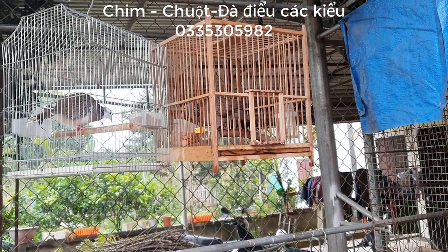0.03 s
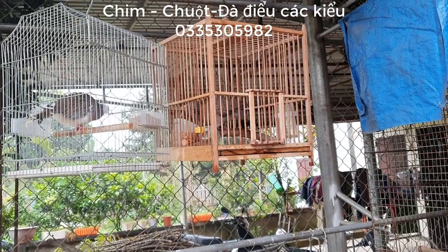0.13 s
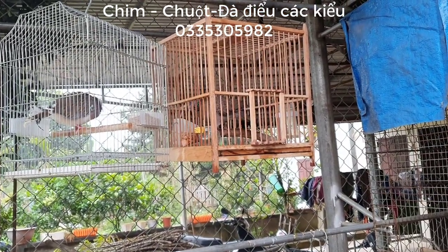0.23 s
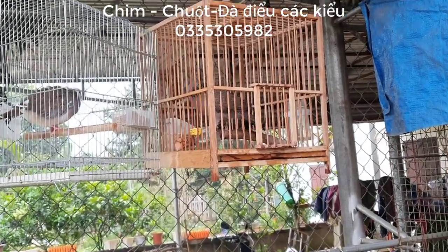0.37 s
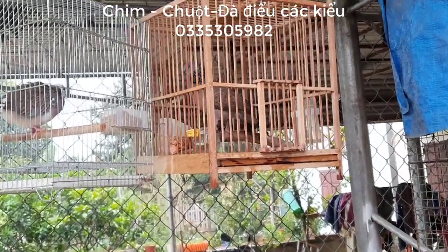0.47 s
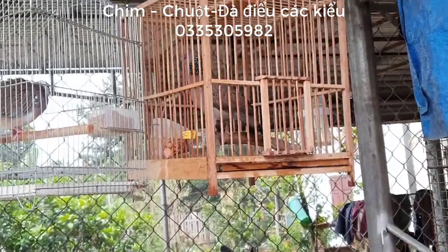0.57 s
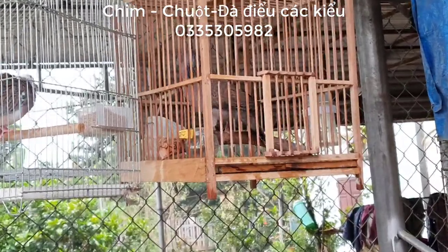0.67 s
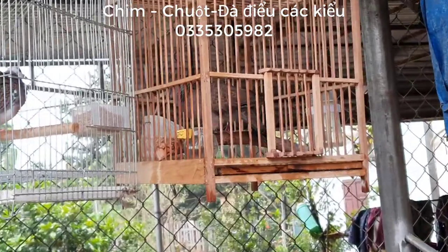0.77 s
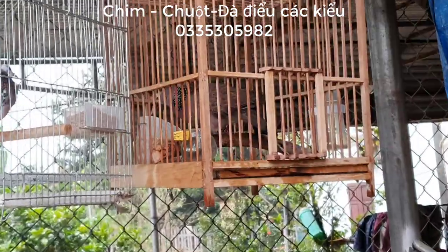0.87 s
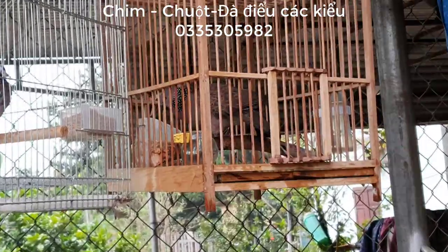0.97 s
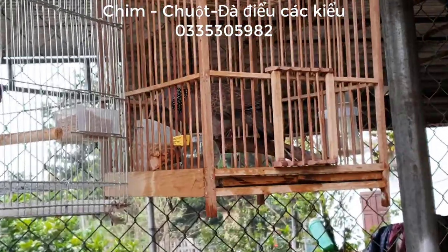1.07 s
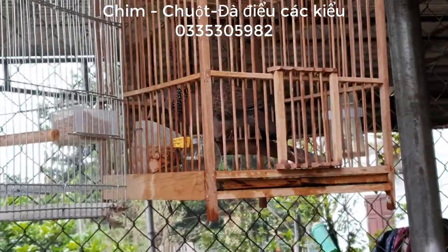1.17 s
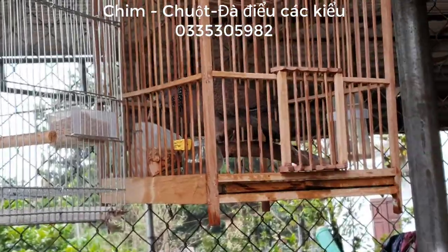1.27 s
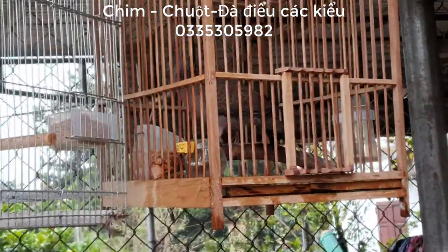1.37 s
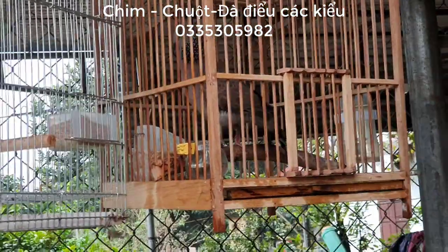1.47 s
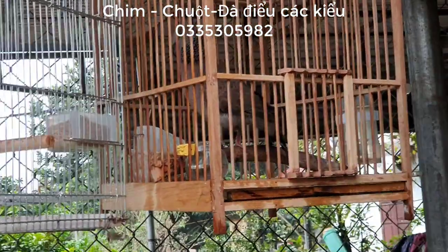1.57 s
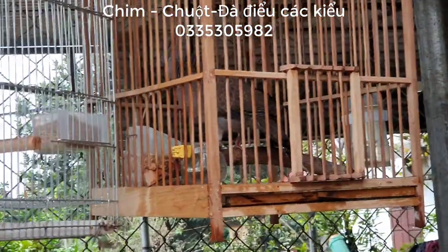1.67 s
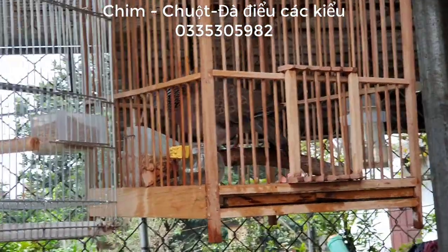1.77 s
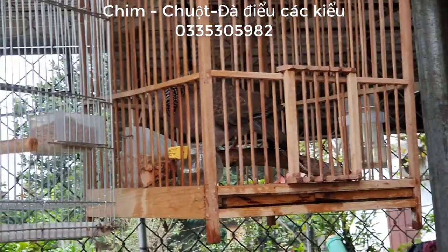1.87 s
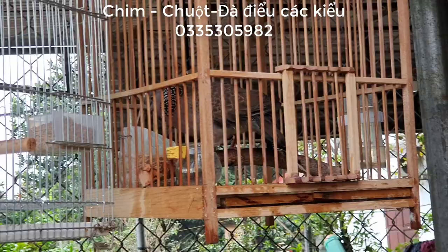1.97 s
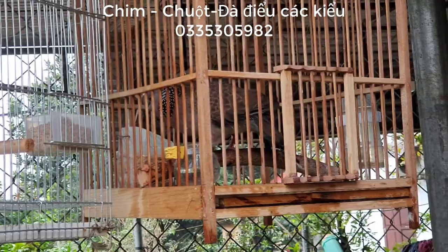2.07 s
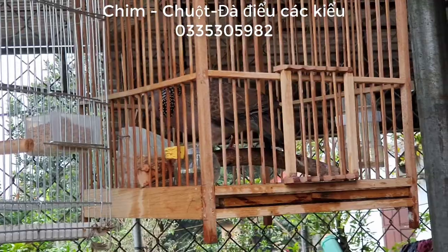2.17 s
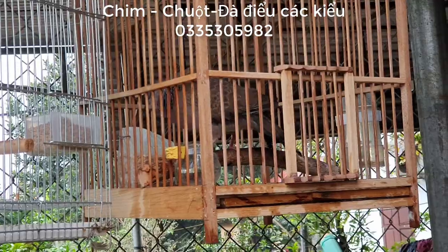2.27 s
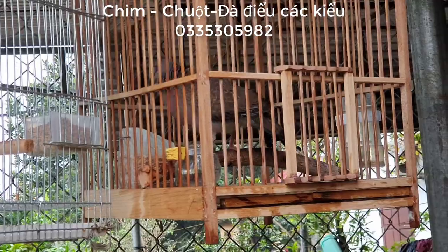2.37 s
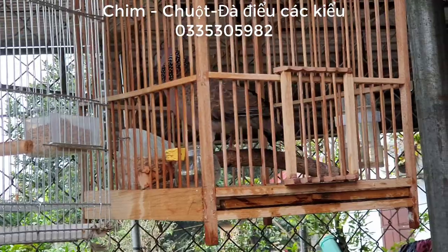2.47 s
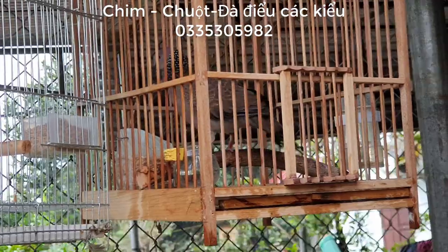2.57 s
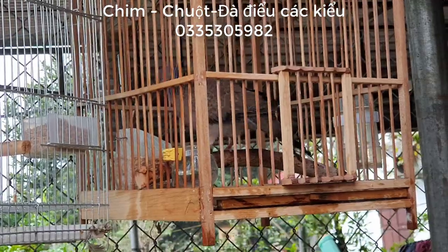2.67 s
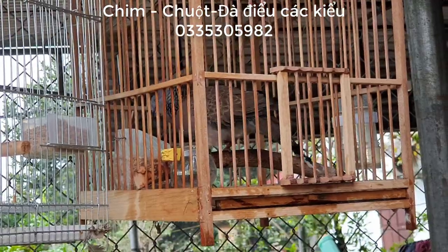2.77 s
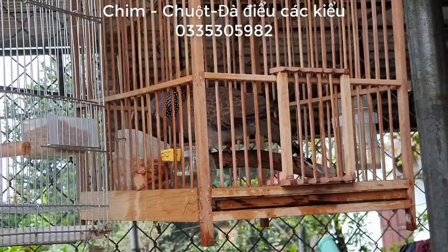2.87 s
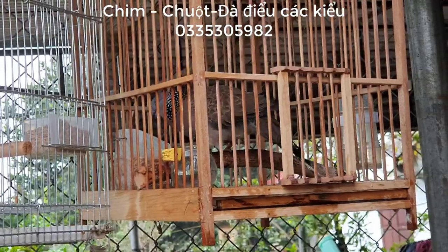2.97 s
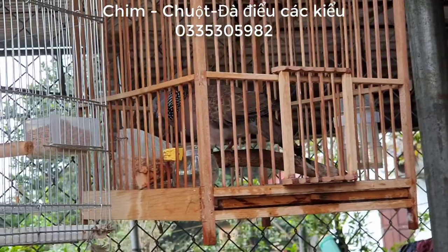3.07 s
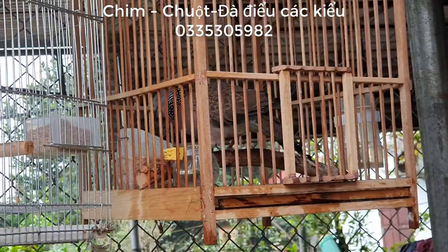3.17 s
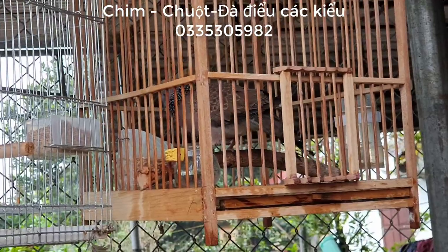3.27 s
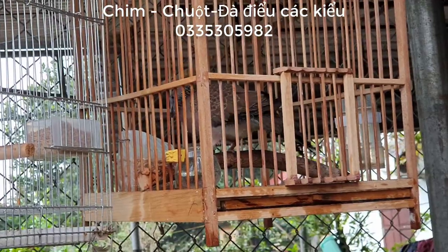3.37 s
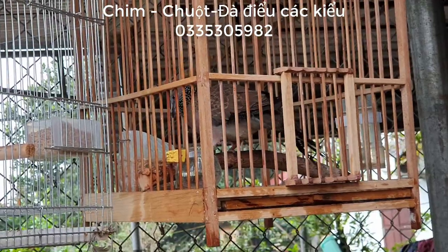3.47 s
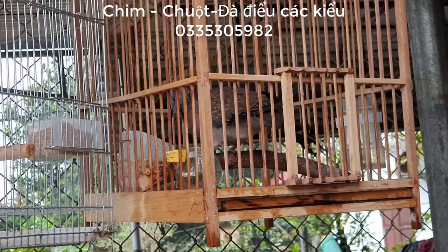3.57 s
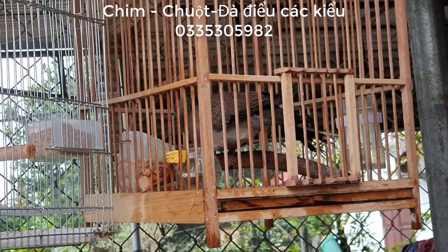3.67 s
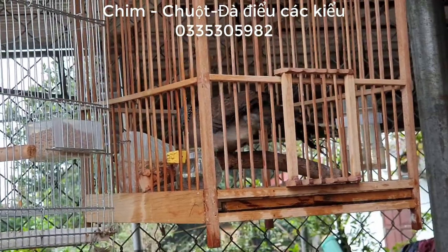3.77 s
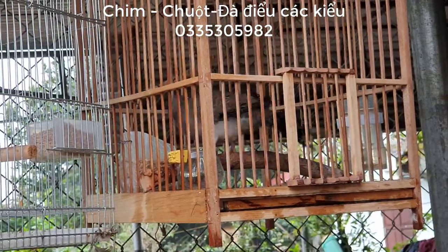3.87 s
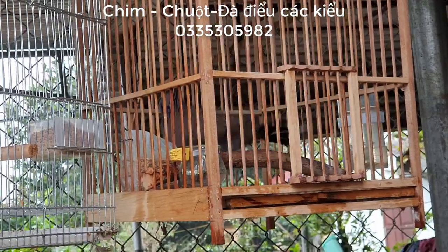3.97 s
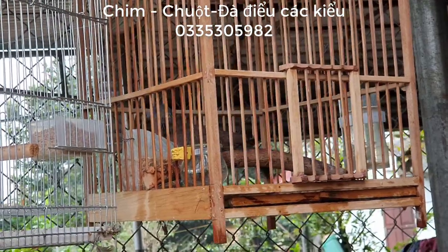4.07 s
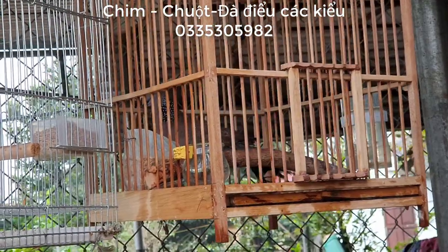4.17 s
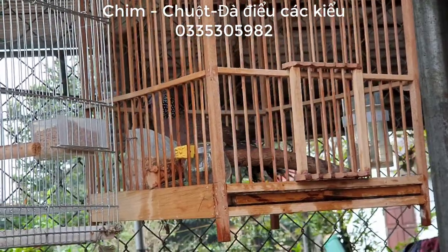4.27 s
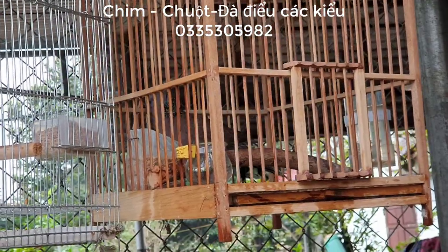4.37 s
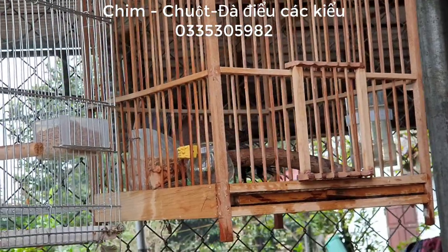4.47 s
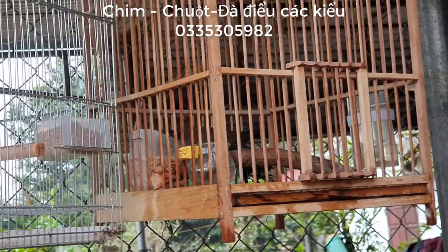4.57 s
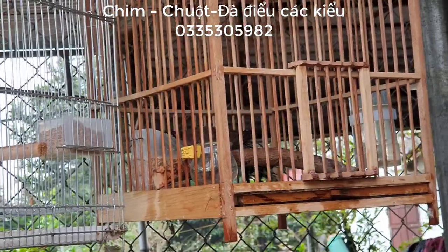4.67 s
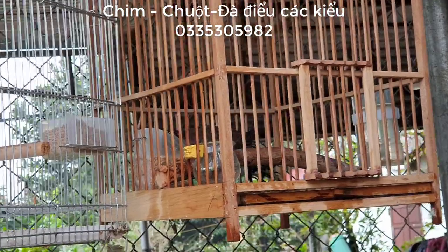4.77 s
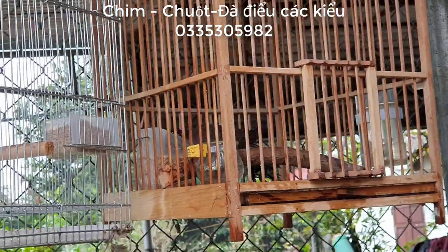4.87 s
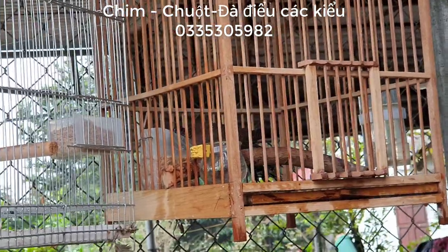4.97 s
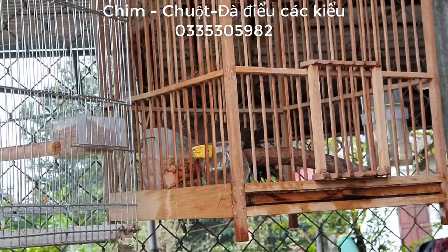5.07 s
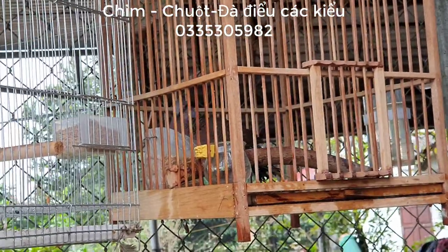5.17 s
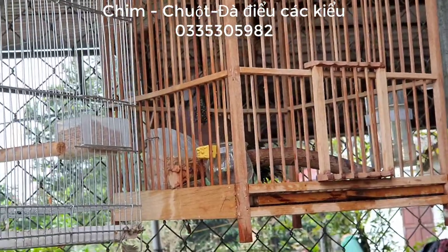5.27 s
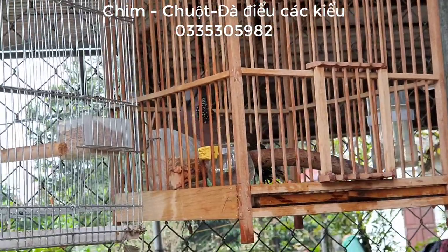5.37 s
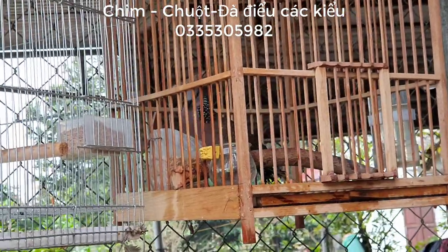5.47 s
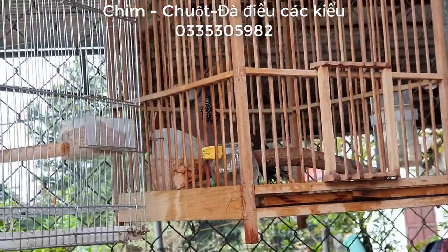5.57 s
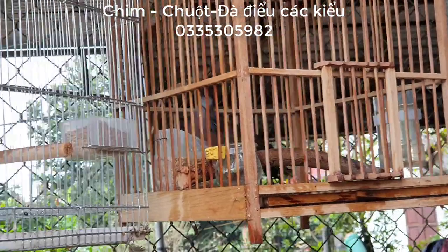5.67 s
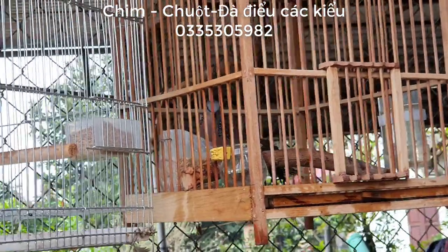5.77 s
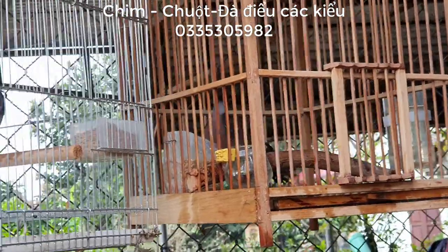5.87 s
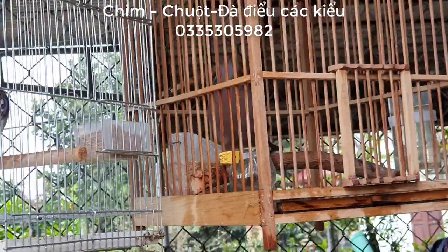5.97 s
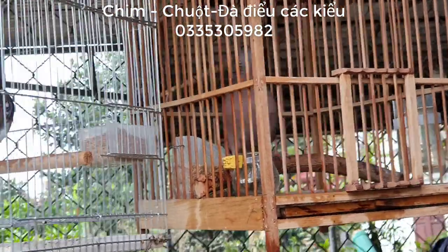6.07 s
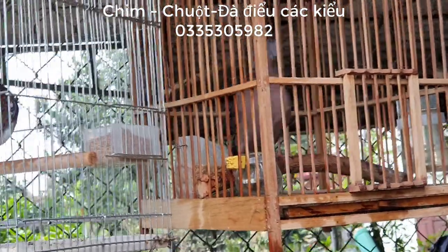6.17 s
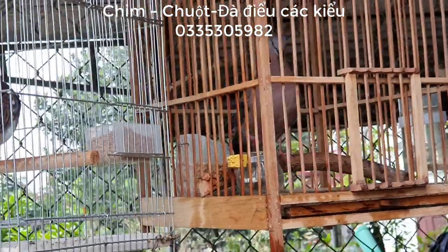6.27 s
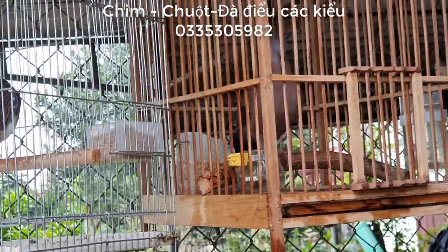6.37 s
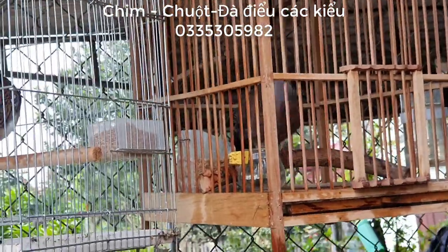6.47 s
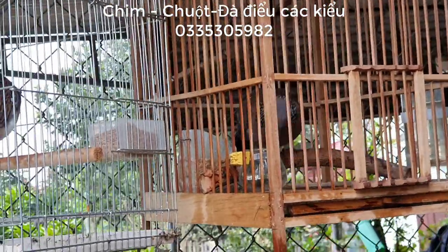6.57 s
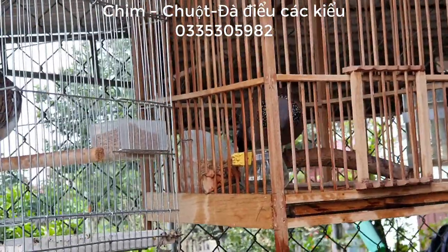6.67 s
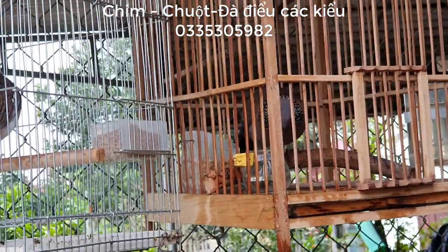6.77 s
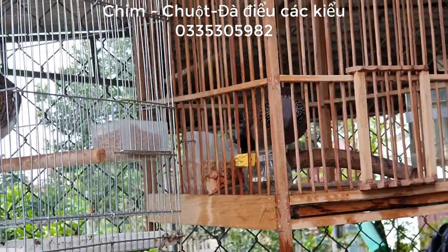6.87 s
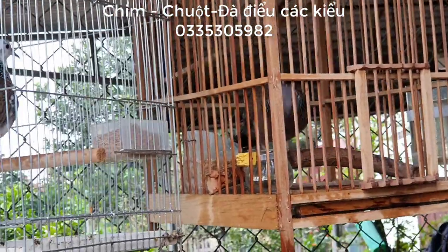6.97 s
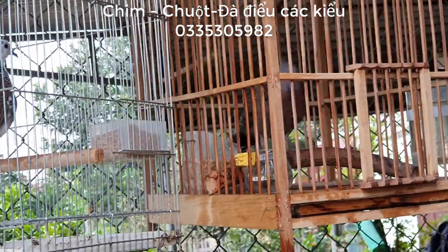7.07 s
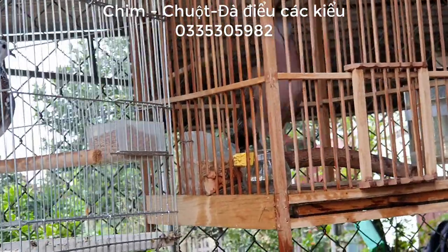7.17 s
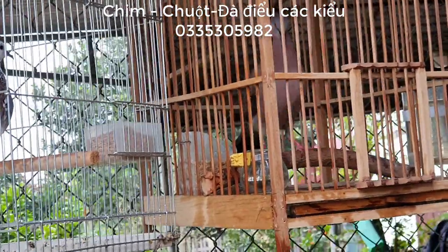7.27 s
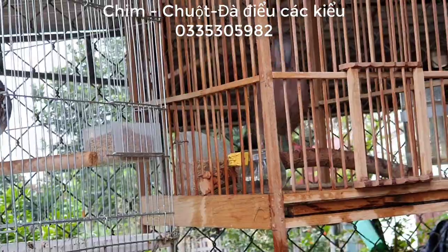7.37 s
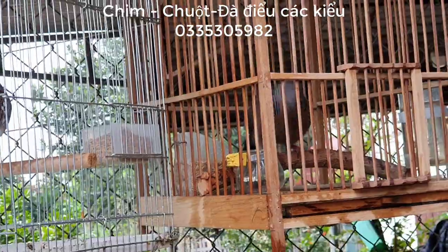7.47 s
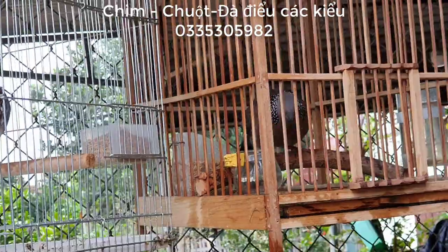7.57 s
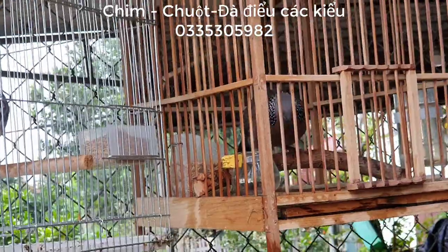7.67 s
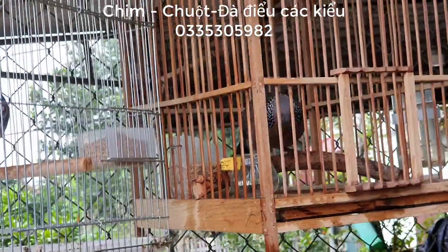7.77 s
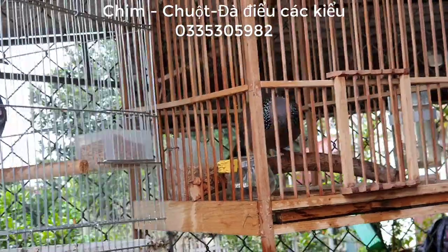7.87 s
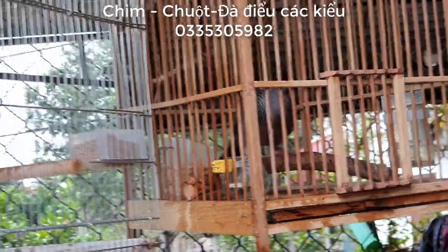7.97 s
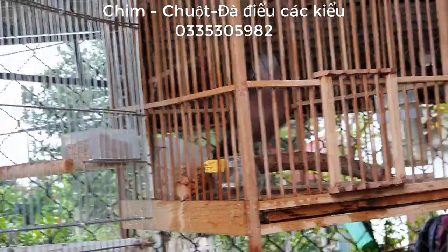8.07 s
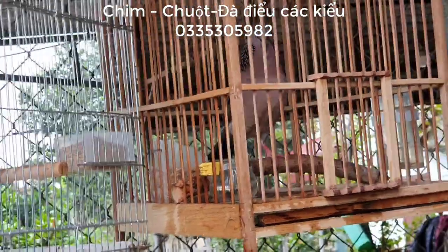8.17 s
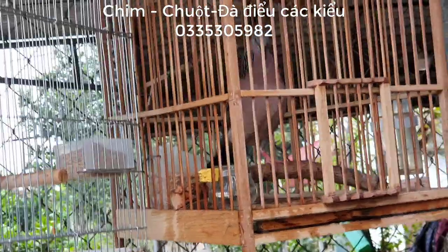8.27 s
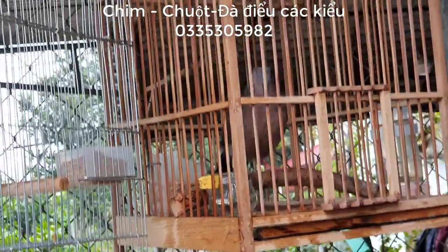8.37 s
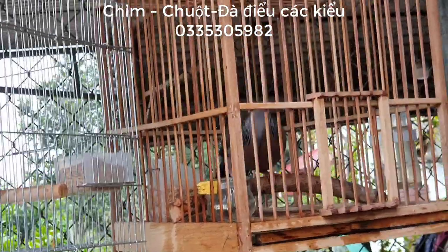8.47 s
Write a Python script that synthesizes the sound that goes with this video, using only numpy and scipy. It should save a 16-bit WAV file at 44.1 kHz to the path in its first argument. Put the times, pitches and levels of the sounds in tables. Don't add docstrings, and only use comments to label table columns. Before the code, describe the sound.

A nearby caged dove begins at once with a long, high, throbbing coo to 0.5 s, then a short soft note at 0.8. Long coos follow at 1.0, 2.0 and 3.0, with short notes before the latter two at 1.8 and 2.8. At 2.3 and 2.4 a finger hits the left microphone with two loud hard knocks, bouncing and scraping, with a parting rub near 2.55. A very faint distant coo comes at 3.7. A low held note at 4.56 leads to a hoarse long coo at 4.9; after a gap, short-long pairs come at 6.5 and 7.5, the last long one lower, and a short coo closes at 8.45. Brief roof reverberation trails the notes. Throughout, small wire ticks, mostly right, and wooden or plastic pecks sit over quiet rumble, shuffling and feather hiss. Thin insect shimmer comes and goes; faint bird whistles appear near 3.1 and from 7.4 to 8.2.

```python
import sys
import numpy as np
from scipy import signal
from scipy.fft import rfft, irfft, next_fast_len
from scipy.io import wavfile
from scipy.ndimage import uniform_filter1d, map_coordinates

SR = 44100
rng = np.random.default_rng(int(sys.argv[2]) if len(sys.argv) > 2 else 0)


def file_out(sig):
    cols = np.atleast_2d(sig).T
    lim = np.clip(cols, -1, 1)
    pcm = np.round(lim * 32767).astype(np.int16)
    wavfile.write(sys.argv[1], SR, pcm)


def undo_db(level):
    steps = np.asarray(level, float) / 20
    return 10 ** steps


N = 375732

# start_s, length_s, top_hz, level_db
SHORT_NOTES = [
    (0.78, 0.12, 720, -21),
    (1.763, 0.12, 702, -19),
    (2.78, 0.11, 703.4, -19.5),
    (6.506, 0.12, 698, -19),
    (7.461, 0.11, 717.5, -19),
    (8.452, 0.11, 698, -18),
]
# start_s, length_s, top_hz, level_db
HELD_NOTE = [
    (4.559, .195, 677, -19.5),
]
# start_s, length_s, top_hz, level_db, hoarseness_db
LONG_NOTES = [
    (.03, .47, 715, -13, 2.5),
    (.985, .4, 701, -12.5, -1),
    (1.981, 0.37, 701.7, -12.5, 1),
    (2.986, 0.34, 694.3, -12.5, 4),
    (4.86, 0.45, 711, -12.5, 3),
    (6.73, 0.38, 700, -13, 3.5),
    (7.665, 0.36, 684, -14, 4),
]
# start_s, length_s, top_hz, level_db before the loss on the way
FAR_NOTE = [
    (3.69, 0.11, 700, -21),
]
# share_of_length, upper_voice_below_top_hz, upper_db, lower_db
SHORT_COURSE = [(0, 118, -21, -12.5), (.14, 48.5, -2.5, -2), (.4, 1.5, -1.5, 0.5), (.68, 9.5, -0.5, 3.5),
                (.85, 65, -5.5, -3), (1, 161.5, -24.5, -9.5)]
# share_of_length, upper_voice_below_top_hz, upper_db, lower_db
HELD_COURSE = [(0, 95, -18, -12), (.1, 20, -4, 2.5), (.24, 0, -1.5, 3.5), (.5, 42, -3, 4.5),
               (.88, 42, -4.5, 4.5), (1, 100, -20, -4)]
# share_of_length, upper_voice_below_top_hz, upper_db, lower_db, throb_re_upper_db
LONG_COURSE = [(0, 122.5, -27, -15.5, -7.5), (.06, 85, -7, -15, -5), (.16, 18.5, -4.5, -13, -6),
               (.3, -1, -6, -6, -6), (.45, 38.5, -0.7, -18, -9), (.62, 78, -0.5, -21, -11),
               (.88, 147, -10, -31.5, -6.5), (.96, 187.5, -11, -37, -5.5), (1, 215.5, -26.5, -47.5, -11.5)]
# frequency_hz, gain_db
NECK_SKIN = [(300, -32.5), (450, -1.5), (540, -2.5), (620, 1), (720, -0.9), (790, -12), (1000, -9.5),
             (1400, -5.5)]

# time_s, peak_db
FINGER_KNOCKS = [
    (2.3005, -2.5),
    (2.319, -14),
    (2.3348, -31),
    (2.396, -3),
    (2.406, -5),
    (2.419, -15),
    (2.531, -19),
]
# time_s, thud_db, scrape_db
FINGER_PRESSES = [
    (2.306, -16.5, -35.5),
    (2.328, -26.5, -48),
    (2.384, -19.5, -19.5),
    (2.399, -13, -13.5),
    (2.433, -38, -20),
    (2.541, -35.5, -28.5),
]
# time_s, level_db
FINGER_SLIDE = [
    (2.299, -41),
    (2.306, -39),
    (2.367, -54),
    (2.385, -23),
    (2.401, -14),
    (2.431, -19),
    (2.538, -20.5),
    (2.55, -38),
    (2.6, -81),
]
# frequency_hz, density_db_per_hz
SKIN_SPECTRUM = [(1180, -22), (2000, -8), (3140, -2.5), (4380, -1), (7060, -6), (7640, -12.5), (13300, -15),
                 (16000, -17)]

# time_s, peak_db, left_minus_right_db, ring_hz
CLAW_TICKS = [(0.0696, -32, -17, 6230), (0.401, -27, -16.5, 9500), (0.549, -27, -8.5, 7130),
              (1.492, -34, -13, 8570), (1.6675, -30, -18, 12750), (1.821, -33, -17, 6100),
              (2.8364, -37, -14, 5310), (2.842, -29, -13, 7100), (3.2113, -27.5, -25, 7100),
              (3.8426, -35, -13, 8750), (4.043, -29, -6, 5000), (4.4526, -34, 8, 6300),
              (4.6038, -27, -17, 8640), (5.0568, -31, -14, 6500), (5.3042, -45, -25, 9700),
              (5.8236, -28, -17, 9200), (7.171, -31, -24, 7590), (7.3158, -40, -16, 9280),
              (7.445, -29, -13, 8600), (7.6922, -23, -24, 8800)]
# frequency_hz, width_hz, level_db
WIRE_MODES = [(3280, 500, -4.5), (6560, 490, -4.5), (8660, 640, 4.5), (11600, 800, 1.5), (13700, 2800, -5)]
# time_s, peak_db, ring_hz
SEED_TAPS = [(0.342, -34.5, 1750), (0.507, -37, 2850), (0.549, -32, 2130), (0.695, -38.5, 2580),
             (1.431, -37, 1720), (2.122, -31.5, 2510), (2.2207, -35.5, 1680), (2.6962, -39, 4560),
             (3.5013, -33, 4460), (3.5717, -30.5, 2525), (3.62, -37.5, 2080), (4.0216, -37, 2600),
             (4.043, -38.5, 2770), (4.2927, -34, 2020), (5.058, -32.5, 2550), (5.779, -35.5, 2360),
             (5.8221, -36, 1930), (6.06, -40, 2320), (6.598, -33.5, 2490), (8.143, -33.5, 2485),
             (8.4261, -34, 3520)]
# start_s, end_s, first_hz, last_hz, level_db
FAR_WHISTLES = [(3.094, 3.225, 3060, 3240, -58), (3.23, 3.298, 3330, 2880, -56),
                (6.607, 6.66, 2640, 2570, -64), (7.446, 7.563, 2900, 3000, -64),
                (7.64, 7.76, 3520, 3540, -56.5), (7.926, 8.044, 3360, 3700, -54),
                (7.835, 7.983, 4230, 4206, -51.5), (7.839, 7.928, 8800, 8650, -60),
                (7.84, 7.915, 11800, 11600, -60), (7.85, 7.94, 6300, 6300, -66),
                (8.141, 8.253, 2600, 2606, -61)]
# start_s, end_s, swell_db
INSECT_BOUTS = [
    (.8, 1.29, 11.5),
    (1.9, 2.598, 11),
    (2.98, 3.35, 9.5),
    (5.353, 6.3, 8.5),
    (6.75, 7.04, 11.5),
]
# frequency_hz, t60_s
ROOF_DECAY = [(300, 0.22), (700, 0.42), (4000, 0.26), (12000, 0.016)]

# time_s, half_length_s, scuffle_swell_db, feather_and_litter_hiss_swell_db
YARD_SHUFFLES = [(0.121, 0.082, 13, 6), (0.318, 0.14, 11, 5), (.5, 0.099, 8, 7), (1.112, 0.31, 9, 4),
                 (1.468, 0.065, 5.5, -0.5), (1.807, 0.16, 7, 1.5), (2.15, 0.19, 3.5, 1.5),
                 (2.397, 0.22, 8.5, 5.5), (2.726, 0.079, 2.5, 4.5), (2.865, 0.07, 3.5, 10),
                 (3.056, 0.27, 10, 4.5), (3.187, 0.046, 1.5, 4.5), (3.555, 0.083, -1.8, 12.5),
                 (3.71, 0.073, 3.5, -2.5), (3.922, 0.066, 2.5, 9), (4.007, 0.04, 3, 2), (4.357, 0.17, 8, 4),
                 (4.545, 0.3, 4, -0.5), (4.735, 0.049, 9, -0.5), (5.042, 0.24, 7, 5),
                 (5.942, 0.072, 6, 9.5), (5.46, 0.061, 11.5, 9), (5.817, 0.077, 10, 8),
                 (6.36, 0.12, 5.5, 4), (6.573, 0.13, 8, 8), (6.945, 0.21, 13, 5), (7.21, 0.069, 5, 8),
                 (7.542, 0.065, 8, 3), (7.866, 0.22, 8, 7.5), (8.41, 0.29, 8.5, 5)]
# frequency_hz, density_db_per_hz
RUMBLE_SPECTRUM = [(12, -53), (20, -11.5), (59, 2.5), (108, -7), (403, -8.5), (461, -15), (500, -24),
                   (650, -33.5), (1100, -120)]
# frequency_hz, density_db_per_hz
SCUFFLE_SPECTRUM = [(180, -21.5), (300, -9), (402, -2), (465, -2.5), (646, 2.5), (695, -5.5), (785, -1.5),
                    (5500, -24.5), (7150, -48), (12100, -120)]
# frequency_hz, density_db_per_hz
HISS_SPECTRUM = [(2350, -6), (4000, -4), (7880, -7.5), (8850, -6), (11100, -11.5), (12300, -8),
                 (14600, -14.5), (16000, -18.5)]
# frequency_hz, correlation
PORT_CORRELATION = [(60, 0.94), (240, 1), (950, 0.52), (3000, 0)]
# frequency_hz, left_minus_right_db
YARD_BALANCE = [(180, -1), (800, 3), (4500, -1), (9000, -7)]

VOICE_GAP_HZ = 95


def unit(x):
    return x / np.sqrt(np.mean(x ** 2) + 1e-20)


def along(points, hz):
    f, v = np.transpose(points)
    return np.interp(np.log(hz + 1), np.log(f + 1), v)


def curves(rows, t):
    s, *columns = np.transpose(rows)
    return [np.interp(t, s, column) for column in columns]


def wobble(rate_hz, size):
    knots = rng.standard_normal(int(size * rate_hz / SR) + 4)
    return map_coordinates(knots, [np.arange(size) * rate_hz / SR])


def filtered(x, response):
    m = next_fast_len(x.shape[-1] + 8192)
    return irfft(rfft(x, m) * response(np.fft.rfftfreq(m, 1 / SR)), m)[..., :x.shape[-1]]


def resonances(modes):
    def response(f):
        return sum((-1) ** k * undo_db(db) * 1j * f * width / (center * center - f * f + 1j * f * width)
                   for k, (center, width, db) in enumerate(modes))
    return response


def sides(pan_db):
    pair = undo_db(np.array([[pan_db / 2], [-pan_db / 2]]))
    return pair / pair.mean()


def dove():
    notes = [note(sung(e, SHORT_COURSE), drift_hz=3.35, flutter_db=2.1) for e in SHORT_NOTES]
    notes += [note(sung(e, HELD_COURSE), drift_hz=1.6, flutter_db=1.0) for e in HELD_NOTE]
    notes += [note(sung(e, LONG_COURSE), drift_hz=5, flutter_db=2.4) for e in LONG_NOTES]
    for s, length, top_hz, db in FAR_NOTE:
        event = (s, length, top_hz, db - 28.5)
        notes.append(note(sung(event, SHORT_COURSE), drift_hz=8.7, flutter_db=7.0))
    out = np.zeros(N + SR)
    for s, x in notes:
        out[round(s * SR):][:len(x)] += x
    return filtered(out[:N], lambda hz: undo_db(along(NECK_SKIN, hz)))


def sung(event, course):
    s, length, top_hz, db, *hoarse_db = event
    lift_db = 0.1361 * (top_hz - 700)
    return [(s + share * length, top_hz - hz, db + high_db, db + low_db + lift_db, *np.add(throb_db, hoarse_db))
            for share, hz, high_db, low_db, *throb_db in course]


def note(rows, drift_hz, flutter_db):
    t = np.arange(rows[0][0] - .008, rows[-1][0] + 0.0033, 1 / SR)
    size = len(t)
    high_hz, high_db, low_db, *throb = curves(rows, t)
    throb_db = (throb[0] if throb else -30) + 2.5 * wobble(14, size)
    tone = 2 * np.pi * np.cumsum(high_hz + drift_hz * wobble(43.94, size)) / SR
    beat = 2 * np.pi * np.cumsum(VOICE_GAP_HZ + drift_hz * wobble(34.8, size)) / SR
    beat = beat + rng.uniform(0, 2 * np.pi)

    def throat_db(k):
        return -10 * np.log10(1 + ((high_hz + k * VOICE_GAP_HZ - 686) / 102) ** 4)

    # distance from the upper voice in gaps, level in dB
    lines = [(0, high_db), (-1, low_db), (-2, low_db - 22.5), (0.82, high_db - 16.5 + throat_db(0.49))]
    for k in np.array([-1, 1, 2, 3]) / 2:
        lines.append((k, high_db + throb_db + throat_db(k) - 6 * k - 4.5))
    voice = 0
    for k, db in lines:
        level = undo_db(db + flutter_db * wobble(52.3, size))
        slip = (k % 1 > 0) * 1.7 * wobble(22, size)
        voice = voice + level * np.sin(tone + k * beat + slip)
    voice = voice + undo_db(high_db - 34.5) * np.sin(2 * tone)
    edge = np.clip(np.minimum(t - t[0], t[-1] - t) / 0.0061, 0, 1)
    return t[0], np.sqrt(2) * edge * voice


def finger():
    t = np.arange(N) / SR
    pushes = np.zeros(N)
    for s, db in FINGER_KNOCKS:
        pushes[round(s * SR)] = undo_db(db)
    knock = filtered(pushes, resonances([(108, 83, 30.0), (760, 400, 30), (2470, 2500, 4)]))
    knock = filtered(knock, lambda hz: 1 / (1 + 1j * hz / 5200) ** 2)

    def band(points):
        return unit(filtered(rng.standard_normal(N), lambda hz: undo_db(along(points, hz))))

    thud_db, scrape_db = pressing(t)
    hiss_db, = curves(FINGER_SLIDE, t)
    grip = undo_db(1.5 * wobble(600, N))
    rub = undo_db(thud_db + 1.8) * band([(25, -46), (60, 5.0), (300, -8.0), (800, -15), (1500, -61)])
    rub = rub + undo_db(scrape_db - 1.1) * grip * band([(400, -44), (900, 4), (3000, -7), (4000, -37)])
    rub = rub + undo_db(hiss_db + 1.2) * grip * band(SKIN_SPECTRUM)
    touching = (t > FINGER_SLIDE[0][0]) * (t < FINGER_SLIDE[-1][0])
    left = -knock + rub * touching
    return np.array([left, undo_db(-44) * np.roll(left, 40)])


def pressing(t):
    s, *peaks_db = np.transpose(FINGER_PRESSES)[:, :, None]
    rise_db_s, falls_db_s = 900, (599, 407)
    return [np.max(db - np.maximum(rise_db_s * (s - t), fall * (t - s)), axis=0)
            for db, fall in zip(peaks_db, falls_db_s)]


def contacts(events, t60, grit, body):
    out, t = np.zeros((2, N + SR)), np.arange(SR // 10) / SR
    for s, db, pan_db, hz in events:
        puff = unit(filtered(rng.standard_normal(len(t)), resonances(body + [(hz, hz / 4, 3)])))
        blow = (np.sin(2 * np.pi * hz * t) + grit * puff) * undo_db(-60 * t / t60)
        blow = blow + 0.26 * puff * undo_db(-60 * t / (6 * t60))
        out[:, round(s * SR):][:, :len(t)] += undo_db(db) * sides(pan_db) * blow / np.abs(blow).max()
    return out[:, :N]


def claws():
    return contacts(CLAW_TICKS, t60=0.0063, grit=0.91, body=WIRE_MODES)


def seed_taps():
    taps = [(s, db, -1.5, hz) for s, db, hz in SEED_TAPS]
    return contacts(taps, t60=0.063, grit=0.58, body=[(1190, 690, -12), (4400, 5500, -7)])


def whistles():
    out = np.zeros(N)
    for s, end, first_hz, last_hz, db in FAR_WHISTLES:
        size = round((end - s) * SR)
        hz = np.linspace(first_hz, last_hz, size) + 70 * wobble(140, size)
        swell = np.sqrt(signal.windows.tukey(size, .4)) * undo_db(db + 8 + 2.5 * wobble(85, size))
        out[round(s * SR):][:size] += swell * np.sin(2 * np.pi * np.cumsum(hz) / SR)
    return out


def insects():
    t = np.arange(N) / SR
    singing_db = uniform_filter1d(sum(db * (t > s) * (t < end) for s, end, db in INSECT_BOUTS), size=2000)
    song = filtered(rng.standard_normal((2, N)), resonances([(4187, 76, 0)]))
    return undo_db(-69 + singing_db + 2.5 * wobble(25, N)) * unit(song)


def roof(x, alike):
    hz, t, z = signal.stft(rng.standard_normal((3, SR // 2)), SR, nperseg=256)
    decay = undo_db(-60 * t / along(ROOF_DECAY, hz)[:, None])
    tail = signal.istft(z * decay, SR, nperseg=256)[1]
    share = np.clip(alike, 0, 1)
    common = np.array([np.roll(tail[2], 4), tail[2]])
    tail = np.sqrt(share) * common + np.sqrt(1 - share) * tail[:2]
    late = np.pad(x, (1500, 0))[None]
    return signal.fftconvolve(late, tail / np.linalg.norm(tail[0]), axes=1)[:, :N]


def yard():
    scuffle_db, hiss_db = shuffling(np.arange(N) / SR)
    stir = .6 * wobble(14, N) + .9 * wobble(60, N)
    low_db = -46 + 0.39 * (scuffle_db + 54.0) + 0.48 * wobble(3.03, N)
    low = undo_db(low_db) * rush(RUMBLE_SPECTRUM, patchy_db=2.0)
    middle = undo_db(scuffle_db + 8.5 + 1.68 * stir) * rush(SCUFFLE_SPECTRUM, patchy_db=3.0)
    high = undo_db(hiss_db + 3.0 + 2.0 * stir) * rush(HISS_SPECTRUM, patchy_db=1.0)
    return low + middle + high


def shuffling(t):
    level_db = np.ones((2, len(t))) * np.array([[-59.5], [-60]])
    for s, half, *swell_db in YARD_SHUFFLES:
        away = np.maximum((t - s) / half, (s - t) / (0.85 * half))
        level_db = level_db + np.array(swell_db)[:, None] * np.exp(-away ** 1.75)
    return level_db


def rush(spectrum, patchy_db):
    z = signal.stft(rng.standard_normal((2, N)), nperseg=512)[2]
    field = uniform_filter1d(uniform_filter1d(rng.standard_normal(z.shape[1:]), 8, 0), 6, 1)
    pair = signal.istft(z * undo_db(patchy_db * unit(field)), nperseg=512)[1][:, :N]

    def shaped(hz):
        angle = np.arccos(np.clip(along(PORT_CORRELATION, hz), -1, 1)) / 2
        return undo_db(along(spectrum, hz)) * [np.cos(angle), np.sin(angle)]

    mid, side = filtered(pair, shaped)
    both = np.array([mid + side, mid - side])
    both = filtered(both, lambda hz: undo_db(along(YARD_BALANCE, hz) * [[.5], [-.5]]))
    both = np.array([np.roll(both[0], 6), both[1]])
    return both / both.mean(0).std()


def scene():
    bird, far = dove(), whistles()
    direct = np.array([undo_db(.7) * np.roll(bird, 4), undo_db(-.7) * bird])
    echo = undo_db(-18) * roof(bird, alike=.2)
    small = claws() + seed_taps()
    small_echo = undo_db(-9.0) * roof(small.mean(0) + 1.2 * far, alike=0.14)
    return direct + echo + finger() + small + small_echo + 0.67 * far + insects() + yard()


def starved(x, gate_db, slope_db):
    hz, _, z = signal.stft(x, SR, nperseg=2048)
    power = uniform_filter1d(np.mean(np.abs(z) ** 2, axis=0), size=30, axis=0)
    threshold_db = gate_db + slope_db * (hz[:, None] - 14000) / 1000
    over_db = 10 * np.log10(np.abs(power) + 1e-20) - threshold_db
    return signal.istft(z * np.clip(over_db / 2 + .5, 0, 1), SR, nperseg=2048)[1][:, :N]


def low_pass(x):
    return signal.sosfilt(signal.butter(12, 16510, fs=SR, output="sos"), x)


def record(dry):
    held = dry / (1 + np.abs(dry) ** 8) ** (1 / 8)
    held = filtered(held, lambda hz: np.clip((15900 - hz) / 400, 0, 1))
    mix = starved(held, gate_db=-89.0, slope_db=1.5)
    return low_pass(mix)


dry = scene()
out = record(dry)
file_out(out)
```